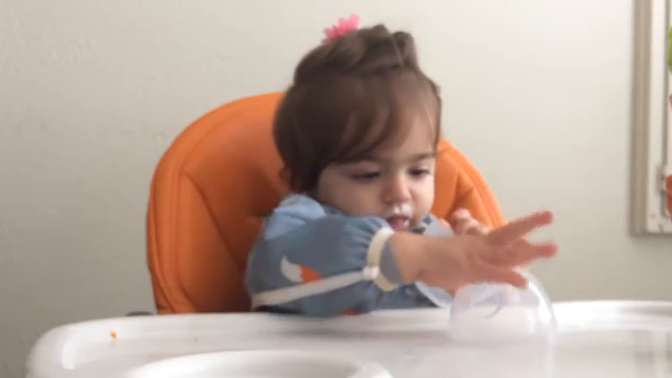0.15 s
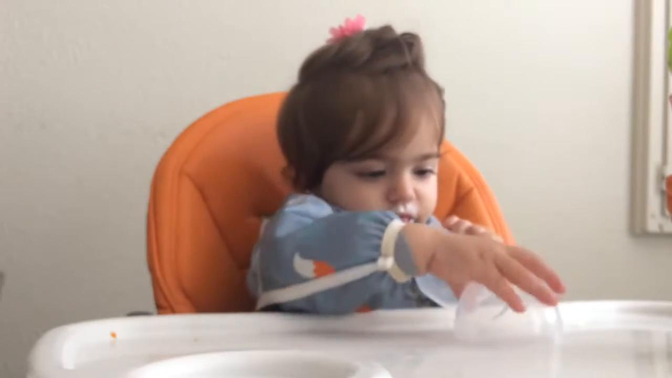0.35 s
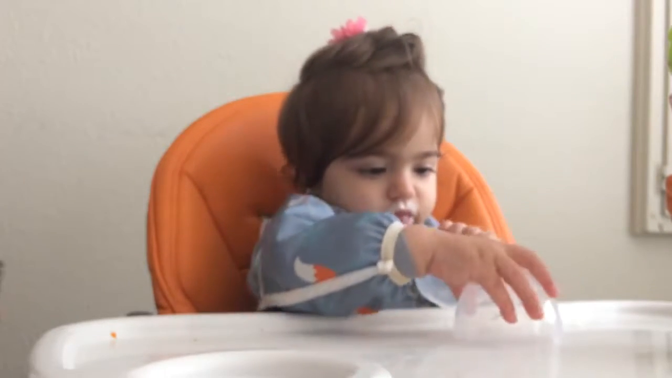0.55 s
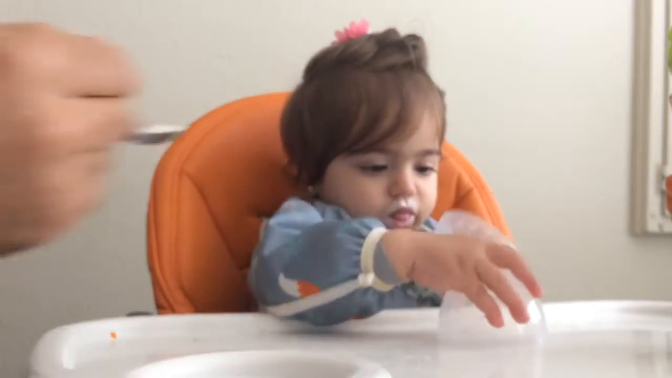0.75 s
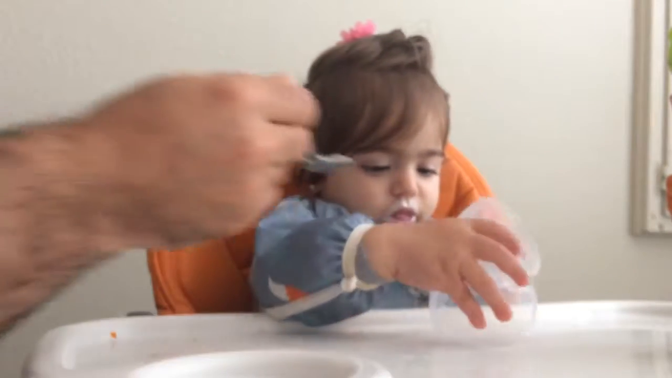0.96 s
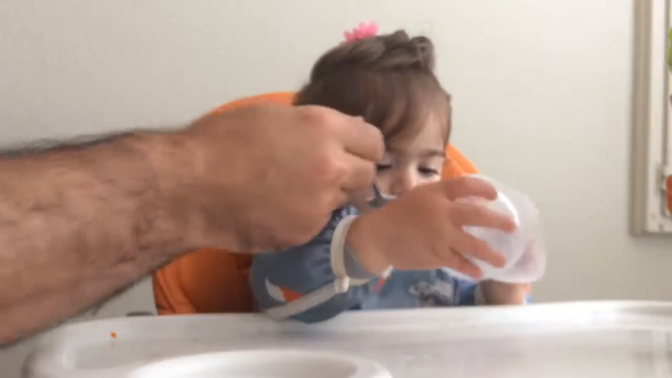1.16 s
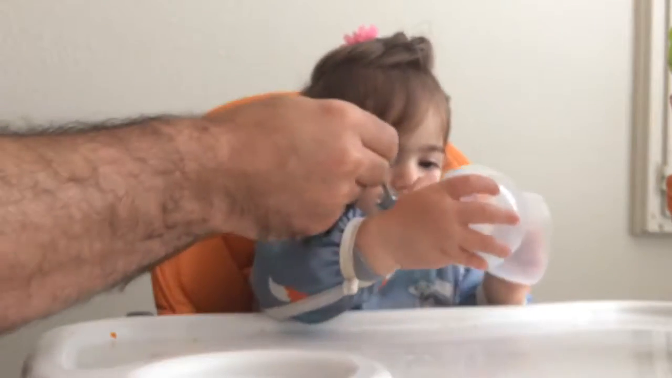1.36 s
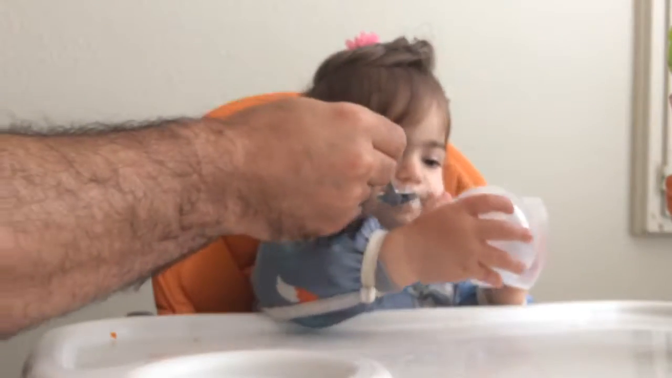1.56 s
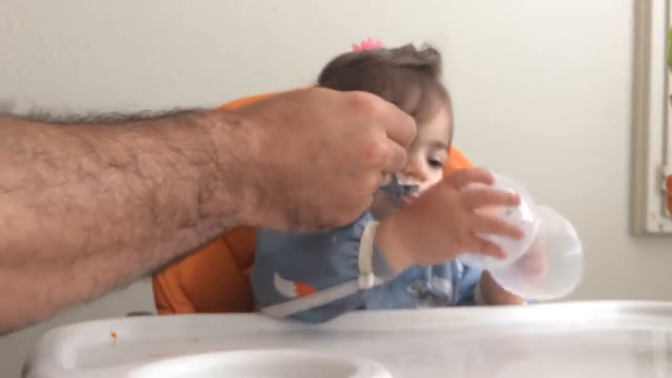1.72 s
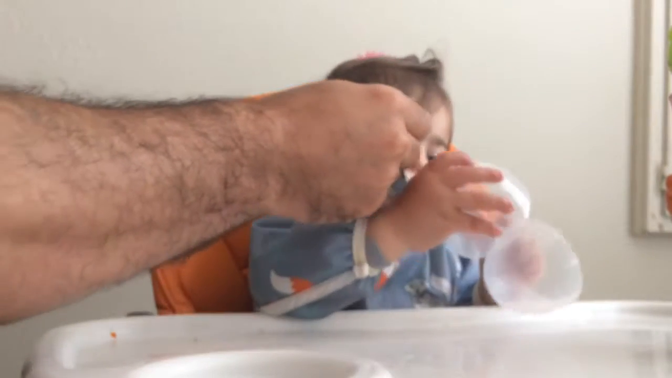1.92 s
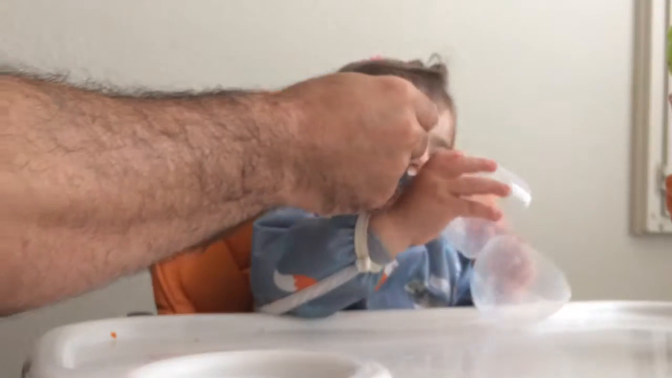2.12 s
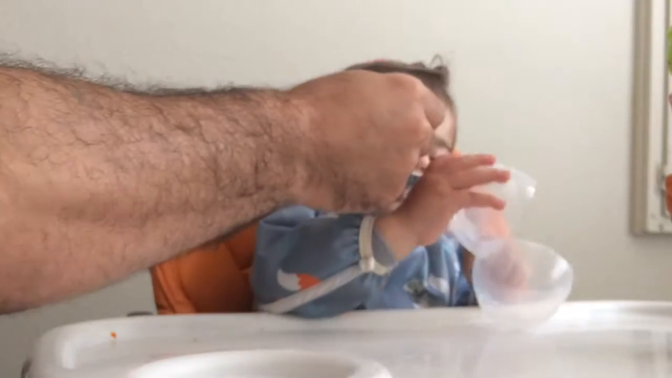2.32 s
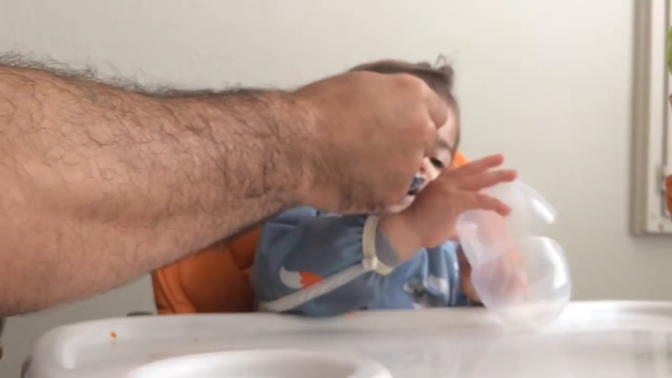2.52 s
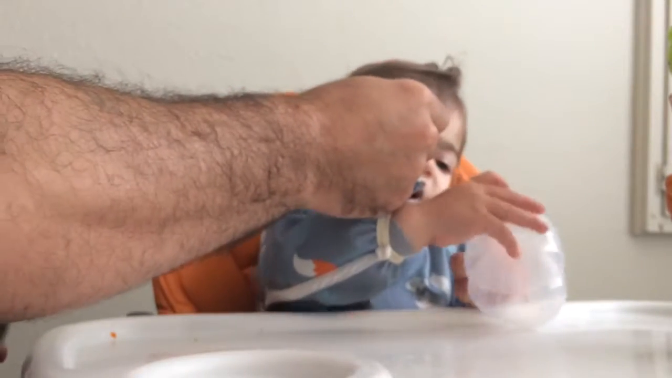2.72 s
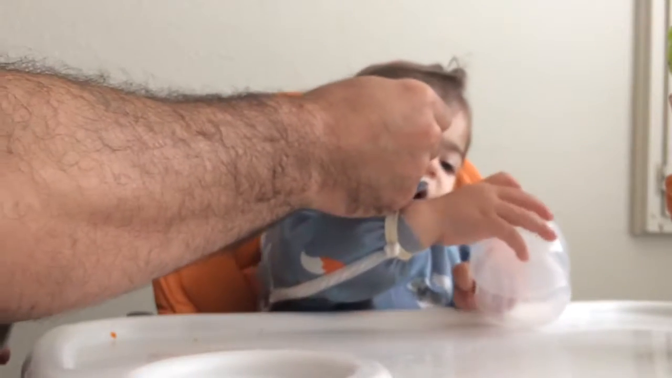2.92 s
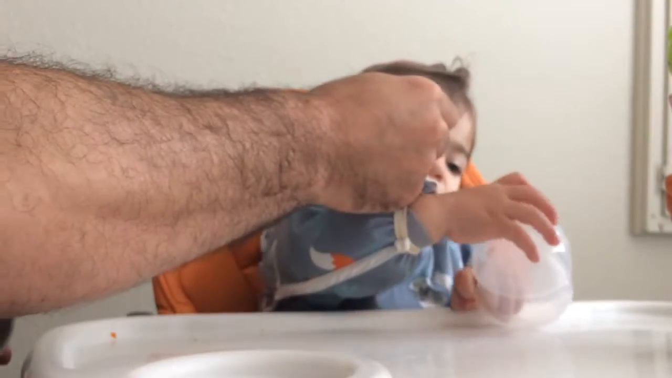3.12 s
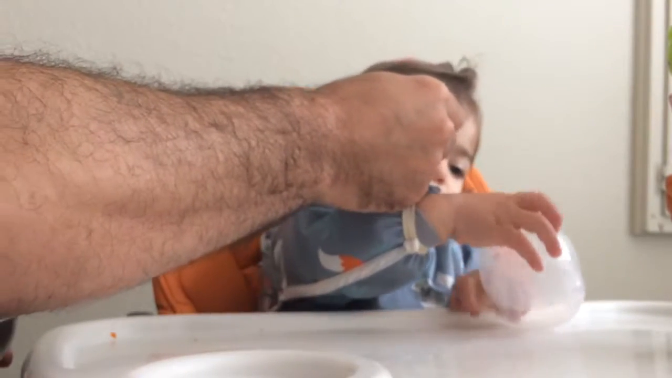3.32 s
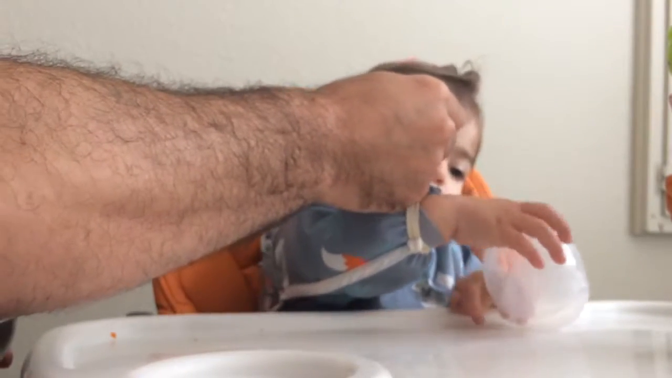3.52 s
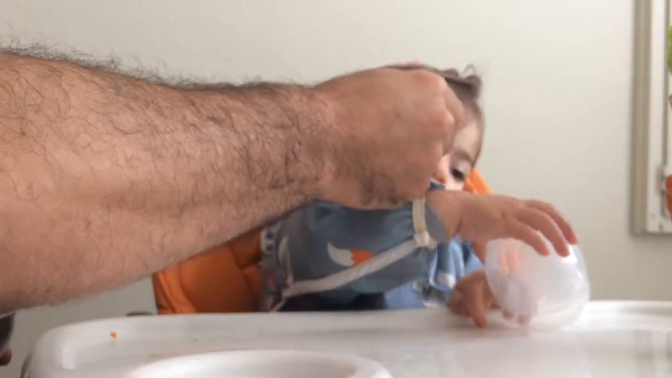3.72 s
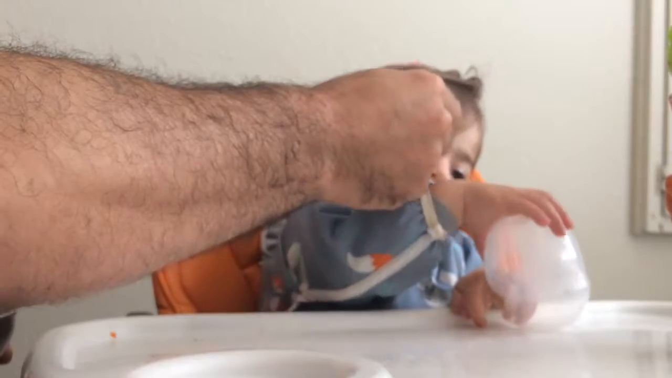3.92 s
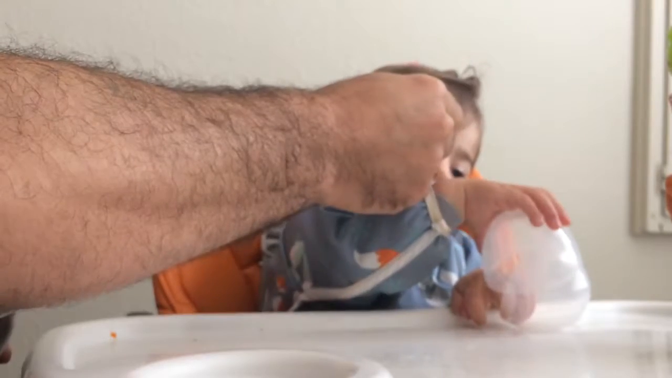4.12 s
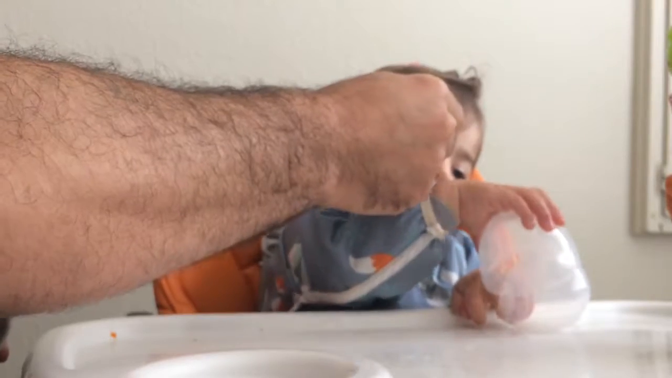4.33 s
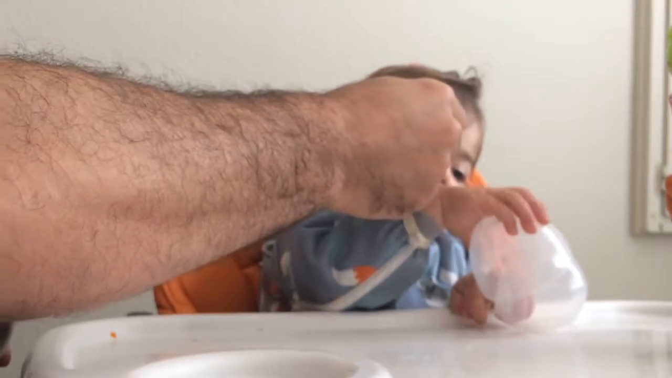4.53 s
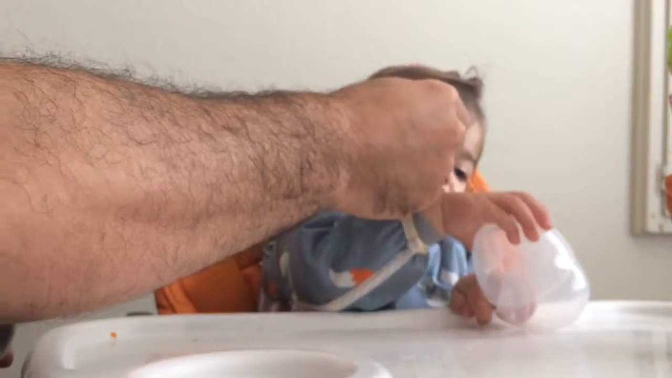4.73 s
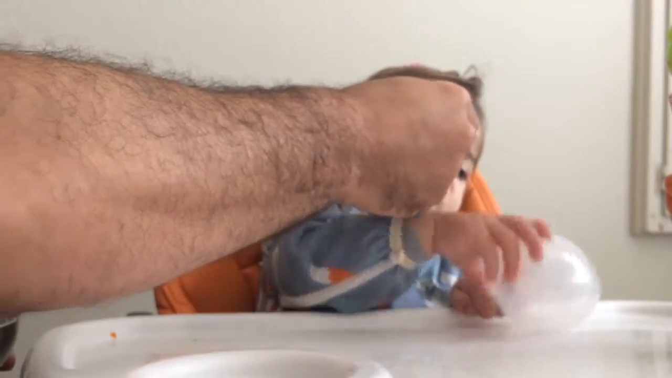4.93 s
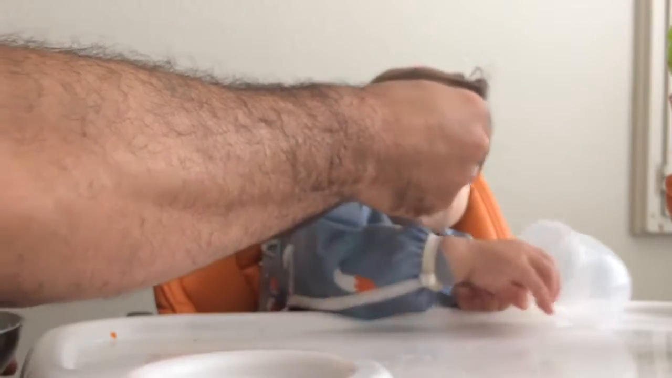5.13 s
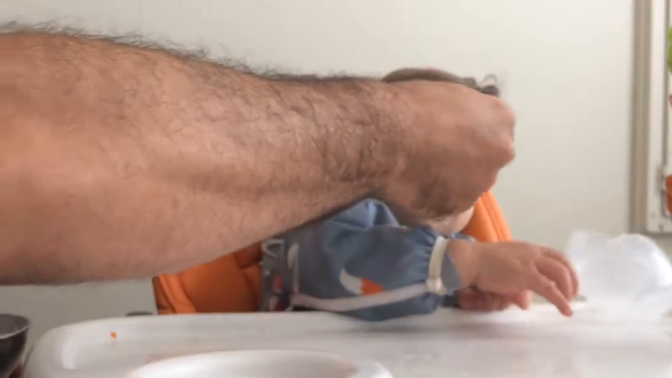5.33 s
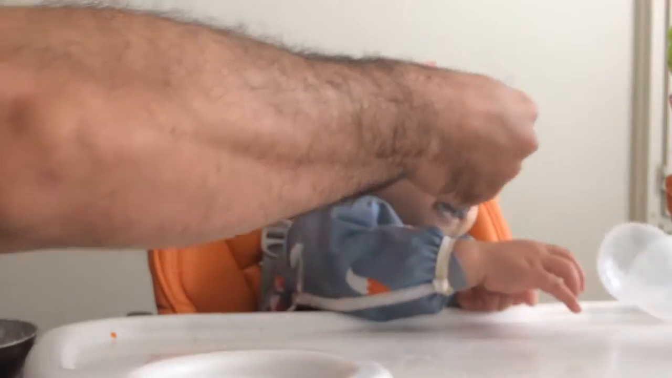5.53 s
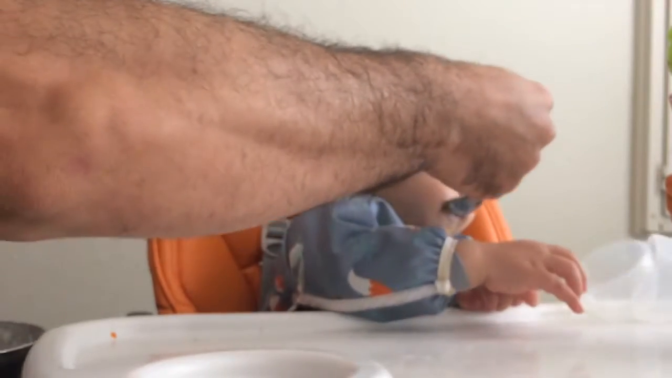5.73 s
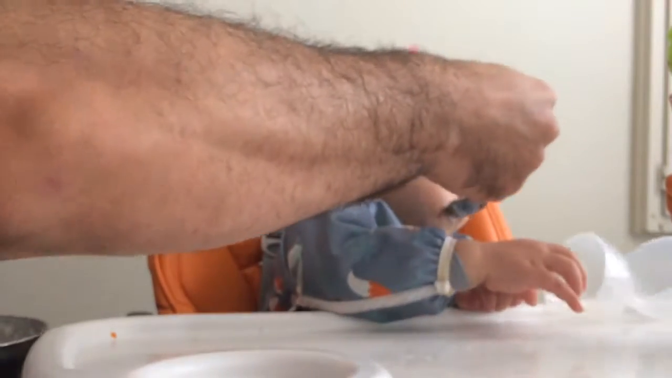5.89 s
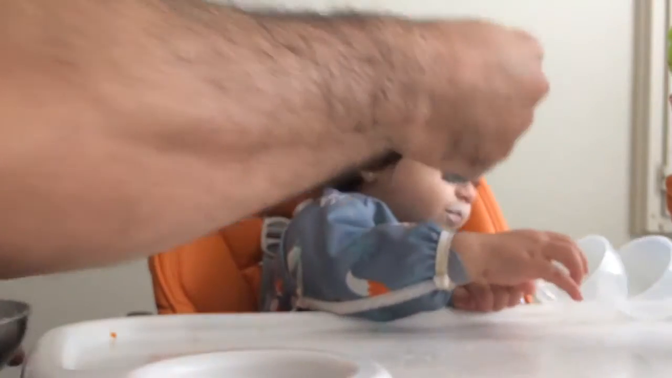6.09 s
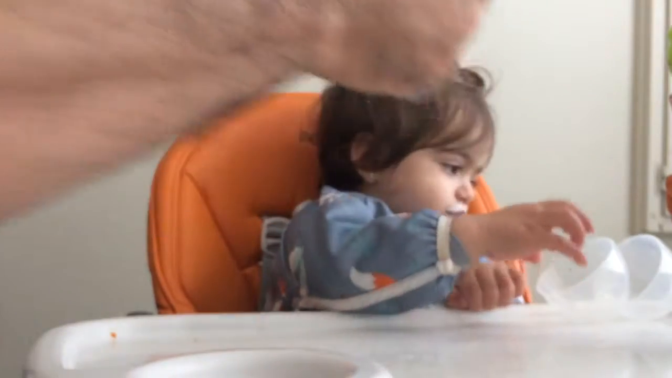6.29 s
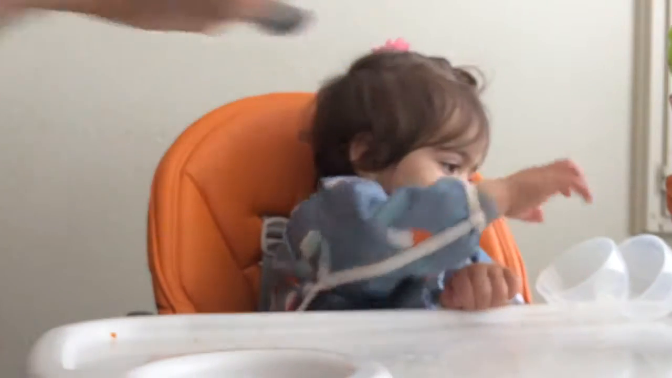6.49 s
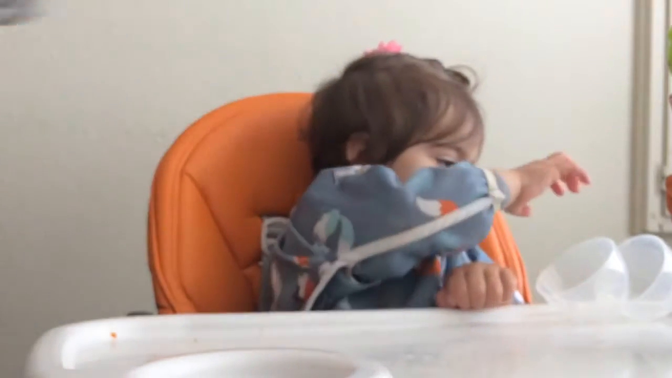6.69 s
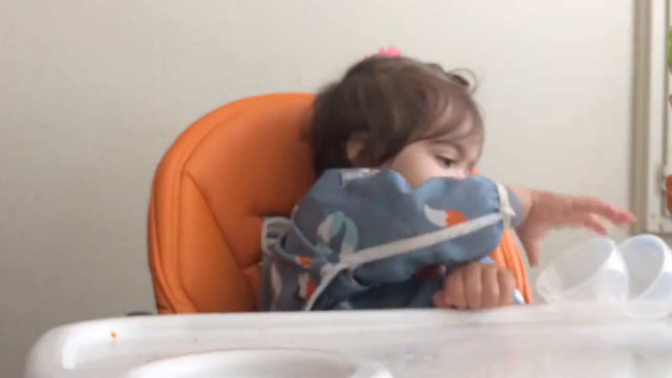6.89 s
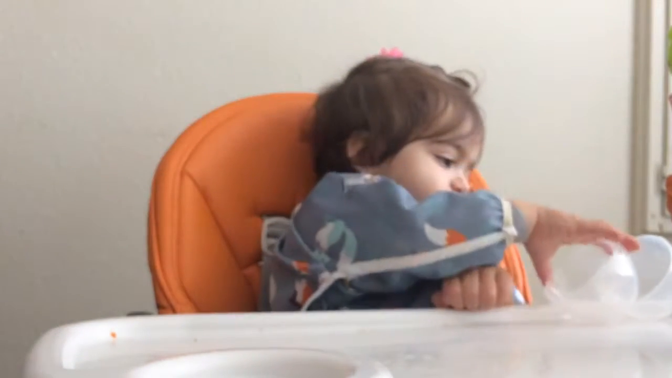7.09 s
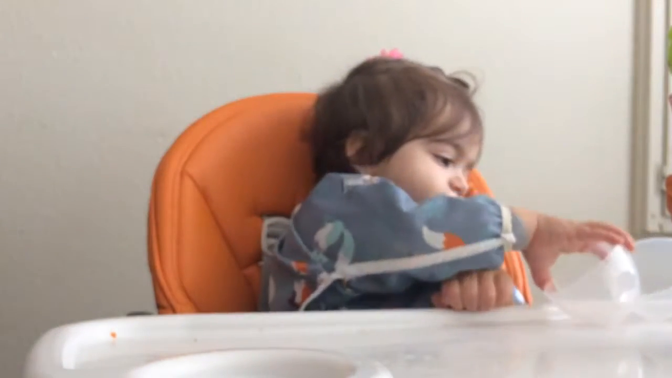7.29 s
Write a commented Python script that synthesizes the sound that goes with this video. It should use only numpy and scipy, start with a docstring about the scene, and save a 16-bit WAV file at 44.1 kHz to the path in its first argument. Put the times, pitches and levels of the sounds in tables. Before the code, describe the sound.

A faint steady hiss and a low appliance hum fill a small room throughout. Two very soft plastic taps come at about 0.4 and 1.1 seconds, among faint brushes of a sleeve. Light plastic bowls then knock clearly against each other and a high chair's plastic tray at 1.7 and 2.2 seconds, with a louder knock and a small rebound around 2.7. Each is close and short, a thin click with a hollow thud and brief ring. A lull follows, with one soft tap and brush at 4.1. At about 5 seconds a bowl tips over in a loud, quick clatter, then rolls on its rim with uneven, lighter knocks. It bumps into the other bowl just before 6 seconds, the loudest hit, and settles with a brief rattle by 6.3. Only the hiss and hum remain until the end, at about 7.5 seconds.

```python
"""A few single knocks of light plastic bowls sound on a high chair's plastic tray in a small room.
Then one bowl tips over, clatters, rolls on its rim and bumps into the other.
Each knock thuds the tray, rings the bowl and clicks its thin wall. Sleeves brush softly,
and an appliance hums behind a steady hiss. Both channels carry the same sound."""
import sys
import numpy as np
from scipy import signal
from scipy.fft import rfft, irfft
from scipy.io import wavfile

SR = 44100
rng = np.random.default_rng(int(sys.argv[2]) if len(sys.argv) > 2 else 0)


def store_pcm(level_fs):
    """Save levels as 16-bit WAV."""
    pcm = np.round(np.clip(level_fs, -1, 1) * 32767).astype(np.int16)
    wavfile.write(sys.argv[1], SR, np.atleast_2d(pcm).T)


N = 324135
RING_TIME = np.arange(SR // 3) / SR  # time axis of one short sound, in seconds


def amp(db):
    """Turns decibels into a gain."""
    return 10 ** (np.asarray(db) / 20)


def unit_rms(x):
    """Scales a sound to an average power of one."""
    return x / np.sqrt(np.mean(x ** 2) + 1e-20)


def unit_energy(x):
    """Scales a sound to a total energy of one."""
    return x / np.sqrt(np.sum(x ** 2) + 1e-20)


def read(points, hz):
    """Looks up a table's value at any pitch, sliding between rows on an octave scale."""
    row_hz, value = np.transpose(points)
    return np.interp(np.log(hz + 1), np.log(row_hz), value)


def coloured(x, points):
    """Makes each pitch in a sound louder or softer, as a table says."""
    gain = amp(read(points, np.fft.rfftfreq(len(x), 1 / SR)))
    return irfft(rfft(x) * gain, len(x))


def add(mix, start_s, sound):
    """Adds a sound to the mix at its start time."""
    part = mix[max(round(start_s * SR), 0):][:len(sound)]
    part += sound[:len(part)]


def drift(fastest_hz):
    """A slow random wander with an average power of one."""
    t = np.arange(N) / SR
    rates_hz = np.geomspace(fastest_hz / 10, fastest_hz, num=10)
    return unit_rms(sum(np.sin(2 * np.pi * (hz * t + rng.random())) / np.sqrt(hz) for hz in rates_hz))


def resonate(x, hz, width_hz):
    """Makes a sound ring at a moving pitch; a narrower width rings longer."""
    turn = np.exp(2j * np.pi * np.cumsum(hz) / SR)
    decay = np.exp(-np.pi * width_hz / SR)
    return 2 * (turn * signal.lfilter([1 - decay], [1, -decay], x / turn)).real


def mode(hz, fade_s):
    """One natural note of a struck object; it dies away by 60 dB in fade_s."""
    return np.sin(2 * np.pi * hz * RING_TIME) * np.exp(-np.log(1000) * RING_TIME / fade_s)


def strike(notes, tilt_db, scatter_db, detune):
    """Rings an object's notes together; the spot struck and the grip vary their strength and pitch."""
    chance = rng.standard_normal((len(notes), 2))
    middle_hz = np.median([row[0] for row in notes])
    sound = 0
    for k, (hz, db, fade_s) in enumerate(notes):
        level_luck, pitch_luck = chance[k]
        gain = amp(db + tilt_db * np.log2(hz / middle_hz) + scatter_db * level_luck)
        sound += (-1) ** k * gain * mode(hz * (1 + detune * pitch_luck), fade_s)  # neighbours oppose
    return unit_energy(sound)


def room(x, gap_s=0.00096, build_s=0.0012):
    """The sound arrives directly, bounces off tray and wall, and leaves a short, fading tail."""
    # how long the tail takes to fall 60 dB: pitch_hz, fade_s
    tail_fades = [(150, 0.47), (500, 0.31), (1200, 0.3), (4000, 0.41), (8000, 0.28), (15000, 0.29)]
    # how strong the tail is: pitch_hz, level_db
    tail_levels = [(150, 3.5), (500, -11), (1200, -10.5), (2300, -6), (3000, -5.5), (3900, -10.5),
                   (5000, -10.5), (8000, -9.5), (15000, -16)]
    # echoes off nearby surfaces: delay_s, gain
    echoes = [(.0021, 0.063), (.0074, 0.15), (.0093, -0.094), (0.0131, .11), (0.017, 0.044)]
    t = np.arange(SR // 2) / SR
    hz, frame_s, bands = signal.stft(rng.standard_normal(len(t)), SR, nperseg=256)
    fade_rate = np.log(1000) / read(tail_fades, hz)[:, None]
    bands = bands * np.exp(-fade_rate * frame_s) * np.sqrt(2 * fade_rate / SR)
    bands *= amp(read(tail_levels, hz))[:, None]
    build_up = np.clip((t - gap_s) / build_s, 0, 1)
    response = signal.istft(bands, SR, nperseg=256)[1][:len(t)] * build_up
    response[0] += 1  # the direct sound
    for delay_s, gain in echoes:
        add(response, delay_s, gain * np.array([.5, .5]))  # uneven surfaces dull the treble
    return signal.fftconvolve(x, response)[:N]


def hiss(level_db=-53, ripple_db=2, ripple_hz=22):
    """Steady air noise; the room's standing waves make some pitches a little louder than others."""
    # the tone of the air noise: pitch_hz, relative_db
    air_colour = [(15, -3), (33, -2.5), (75, -0.5), (200, 1.5), (300, -5), (450, -7), (640, -15),
                  (1100, -16.5), (1700, -12), (2800, -24.5), (4000, -21.5), (5300, -23), (6000, -18.5),
                  (8000, -15.5), (11000, -19), (15500, -30.5)]
    # resonances that stand out of it: pitch_hz, width_hz, boost_db
    humps = [(1480, 73, 4.9), (1562, 13, 10.4), (1771, 153, 10.4), (4844, 96, 8.9), (6894, 83, 11),
             (7130, 146, 7.8), (8290, 180, 4)]
    hz = np.fft.rfftfreq(N, 1 / SR)
    humps_db = sum(db / (1 + (2 * (hz - centre) / width) ** 2) for centre, width, db in humps)
    heights = rng.standard_normal(size=4096)
    ripple = np.interp(hz / ripple_hz, np.arange(len(heights)), heights) * np.minimum(hz / 1000, 1)
    colour_db = read(air_colour, hz) + humps_db + ripple_db * ripple
    return amp(level_db) * unit_rms(irfft(rfft(rng.standard_normal(N)) * amp(colour_db), N))


def hum(waver_db=1.5, waver_hz=0.42):
    """A distant appliance motor whose speed and level waver slightly."""
    # the motor's tones: pitch_hz, level_db
    tones = [(103.3, -53), (243, -73.5)]
    speed = 1 + waver_hz / tones[0][0] * drift(4)
    motor_time = np.cumsum(speed) / SR
    return sum(amp(db + waver_db * drift(5.1)) * np.sqrt(2) * np.sin(2 * np.pi * hz * motor_time)
               for hz, db in tones)


def brushes(grain=0.16, rub_db=11, rub_octaves=0.76):
    """Cloth and skin slide over plastic in short, grainy swells, each with its own rubbing pitch."""
    # soft strokes of hand and sleeve: start_s, length_s, level_db, rub_hz
    strokes = [(0.747, 0.1, -60, 2000), (0.92, 0.23, -67, 4800), (1.11, 0.066, -56, 1900),
               (1.472, 0.15, -66.5, 4000), (2.311, 0.12, -57.5, 2680), (4.091, 0.094, -64, 1500)]
    # the tone all strokes share: pitch_hz, relative_db
    cloth_colour = [(200, -33), (1100, 4), (2000, 3), (3000, 0.5), (4700, 3), (6500, -2), (15000, -42)]
    out = np.zeros(N)
    hz = np.fft.rfftfreq(len(RING_TIME), 1 / SR)
    for start_s, length_s, level_db, rub_hz in strokes:
        slips = rng.standard_normal((2, len(RING_TIME)))[0]
        grainy = slips * np.exp(grain * slips)
        octaves_away = np.log2((hz + 1) / rub_hz)
        colour_db = read(cloth_colour, hz) + rub_db / (1 + (octaves_away / rub_octaves) ** 2)
        fibres = unit_rms(irfft(rfft(grainy) * amp(colour_db)))[:round(length_s * SR)]
        add(out, start_s, amp(level_db) * np.hanning(len(fibres)) * fibres)
    return out


def rolling(bumps_per_s=520, spread_db=3, ring_db=-4, ring_width_hz=130, fade_s=0.072):
    """The rim meets the tray in tiny, uneven bumps that ring the bowl at a pitch that moves as it turns."""
    # the bowl rolling and settling on its rim: time_s, level_db, ring_hz
    path = [(4.9, -59.5, 1000), (4.984, -57.5, 1000), (5.13, -60, 1040), (5.31, -58, 750), (5.39, -61, 746),
            (5.464, -57, 1110), (5.53, -53, 1140), (5.62, -60, 1110), (5.70, -60.5, 580), (5.82, -65, 910),
            (5.86, -48.5, 850), (5.945, -57, 730), (5.99, -50, 1190), (6.05, -51.5, 1440),
            (6.12, -62, 1480), (6.3, -83, 1500)]
    # the tone of the rim on the tray: pitch_hz, relative_db
    scrape_colour = [(80, -22), (220, -8), (400, 10.5), (650, 4.5), (1150, 5.5), (2200, -3), (3700, -8),
                     (7000, -6.5), (15000, -31)]
    t = np.arange(N) / SR
    time_s, level_db, ring_hz = np.transpose(path)
    sizes = amp(spread_db * np.minimum(rng.exponential(1, N), 3)) * rng.choice([-1, 1], N)
    bumps = sizes * (rng.random(N) < bumps_per_s / SR)
    scrape = coloured(bumps, scrape_colour)
    ring = resonate(scrape, np.interp(t, time_s, ring_hz), ring_width_hz)
    roll = unit_rms(unit_rms(scrape) + amp(ring_db) * unit_rms(ring))
    moving = np.clip(np.minimum(t - time_s[0], time_s[-1] - t) / fade_s, 0, 1)
    return roll * moving * amp(np.interp(t, time_s, level_db))


def hollow(hz, swell_s=0.01065, note_db=4, sag_s=0.063):
    """The hollow under the tray booms a little late; its note sinks as the load lifts."""
    # the tone of the tray's hollow underside: pitch_hz, relative_db
    air_colour = [(90, -36), (190, -37), (300, -2), (400, -16), (600, -28), (1000, -2.5), (3000, -36)]
    swell = (RING_TIME * np.exp(-RING_TIME / swell_s)) ** 2
    air = unit_energy(coloured(rng.standard_normal(len(RING_TIME)), air_colour) * swell)
    turns = np.cumsum(hz * np.exp((swell_s - RING_TIME) / sag_s)) / SR
    note = unit_energy(np.sin(2 * np.pi * turns) * swell)
    return unit_energy(air + amp(note_db) * note)


def wall_click(tilt_db, spot_hz, snap_db=-4.0, snap_s=0.0013, spot_db=-3.5, spot_fade_s=0.013):
    """The thin wall's high notes, the note of the spot struck, and a snap of noise as the edges meet."""
    # the tone of the snap: pitch_hz, relative_db
    snap_colour = [(500, -35), (2500, 2), (6000, 6.5), (10000, -3), (16000, -16)]
    # natural notes of a bowl's thin wall: pitch_hz, relative_db, fade_s
    wall_notes = [(2480, -3, 0.0087), (3200, -7, 0.005), (3850, 1.5, 0.0082), (4130, 0.5, 0.0034),
                  (4920, -3.5, 0.0021), (5900, -1.5, 0.0067), (6370, 2, 0.0034), (7000, -1.5, 0.0042),
                  (9000, -8, 0.0035), (11200, -11, .003), (14100, -11, 0.0024)]
    noise = coloured(rng.standard_normal(len(RING_TIME)), snap_colour)
    snap = unit_energy(noise * np.exp(-RING_TIME / snap_s))
    wall = strike(wall_notes, tilt_db, scatter_db=5.0, detune=0.03)
    spot = unit_energy(mode(spot_hz, spot_fade_s))  # stands out more when the contact is soft
    return unit_energy(wall + amp(spot_db - tilt_db / 2) * spot + amp(snap_db + tilt_db / 2) * snap)


def bowl_ring(hz, fade_s, overtones_db, flex_s=0.001):
    """The whole bowl flexes at a pitch set by how it is held; its higher notes die sooner."""
    # the bowl's higher notes: pitch_ratio, relative_db
    overtones = [(1.52, 12.5), (2.1, 6), (3.08, 7.5)]
    upper = sum((-1) ** k * amp(db) * mode(hz * ratio, fade_s / np.sqrt(ratio))
                for k, (ratio, db) in enumerate(overtones))
    flex = 1 - np.exp(-RING_TIME / flex_s)  # plastic gives way before it springs back
    return unit_energy(flex * (mode(hz, fade_s) - amp(overtones_db) * upper))


def contact(level_db, ring_hz, fade_s, tray_db, boom_hz, boom_db, click_db, click_hz, tilt_db):
    """One knock thuds the tray, rings the bowl and clicks its wall."""
    # natural notes of the tray: pitch_hz, relative_db, fade_s
    tray_notes = [(135, -13, 0.065), (210.5, -7.5, 0.074), (265, -7, 0.06), (397, 4, 0.012),
                  (570, 5.5, 0.018), (595, 2.5, 0.031), (687, 3, 0.014)]
    # longer-lasting notes of the bowl's wide rim: pitch_hz, relative_db, fade_s
    rim_notes = [(890, -14, .2), (960, 13, 0.087), (1025, -15, 0.18), (1110, 5, 0.22), (1200, -7, 0.25),
                 (1635, 3, 0.22)]
    tray = strike(tray_notes, tilt_db=0, scatter_db=1.2, detune=.02)
    rim = strike(rim_notes, tilt_db=0, scatter_db=1.5, detune=.002)
    thud = unit_energy(tray + amp(boom_db) * hollow(boom_hz))
    # pressing on the tray brings out the bowl's higher notes
    ring = bowl_ring(ring_hz, fade_s, overtones_db=-19.5 + 2 * tray_db)
    click = wall_click(tilt_db, click_hz) + amp(-16) * rim  # sharp knocks set the free rim singing
    return amp(level_db) * (ring + amp(tray_db) * thud + amp(click_db) * click)


def knocks():
    """The bowls hit the tray and each other: single knocks first, then a quick clatter."""
    # one row a knock: start_s, level_db, ring_hz, fade_s, tray_db, boom_hz, boom_db,
    # click_db, click_hz, tilt_db (per octave; higher makes the click brighter)
    blows = [ (0.378, -41, 1060, .017, -5, 420, -4, 4, 3350, -10),
             (1.088, -34, 890, 0.022, 5, 335, 1, -12, 3800, -2),
             (1.7232, -7, 1470, 0.0045, -18, 524, -6, -6.5, 4050, 1.5),
             (2.1608, -9, 1270, 0.0048, 5, 491, -0.5, -7, 3140, 2),
             (2.637, -27, 1070, .008, -6, 450, 5, -11, 3800, -1),
             (2.7320, -2.5, 1270, 0.0099, -11.5, 440, 0.5, -12.5, 4150, -1.5),
             (2.8325, -20.5, 1004, 0.033, -6, 480, 1, 0.5, 4800, -0.5),
             (4.1232, -32.5, 1010, 0.019, -9, 450, -11, -21, 3800, -4),
             (5.0519, -11.5, 1074, 0.016, 2, 541, -6, 1, 6040, 6.5),
             (5.0644, -16, 1110, .02, -1, 507, -7, -18, 3000, -2),
             (5.081, -4, 1020, 0.012, -4, 585, -3, 3, 4900, 4),
             (5.1110, -13, 1070, 0.013, -4.5, 554, 0, -7, 5600, 11),
             (5.121, -25, 1050, .016, -9, 556, -2, 0, 4700, -1),
             (5.1429, -16.5, 990, 0.02, -3, 547, -4, -0.5, 3850, -12),
             (5.2653, -16.5, 1640, 0.016, -2.5, 423, 0, -6, 5370, -9),
             (5.2796, -14.5, 910, 0.004, -6.5, 417, -2, -19, 3800, -4),
             (5.2873, -19, 1020, .012, -1.5, 426, -6, -19, 3820, 1),
             (5.3260, -27, 790, .016, 2, 404, -4, -20, 3800, -4),
             (5.4103, -8, 784, 0.021, 2.5, 489, -5.5, -9.5, 2190, -4),
             (5.464, -24, 1144, .035, 3.5, 460, 1, -7, 3800, 5),
             (5.507, -33, 1120, .025, -2, 476, -2, 2.5, 3600, -4),
             (5.5727, -25.5, 1100, .012, -5, 523, -6, 3, 2900, 7),
             (5.5908, -16, 1103, 0.03, 1.5, 615, -1, -4, 2550, -4),
             (5.6007, -21.5, 1130, .024, -6, 555, -2, -7, 3600, 6),
             (5.6493, -26.5, 905, .024, 5.5, 557, 0, 1.5, 3880, 18),
             (5.664, -28.5, 990, .02, 5, 540, -2, 2, 3040, -2),
             (5.7820, -24, 1070, .031, -1, 546, -4, 5, 4960, 5),
             (5.798, -26, 1130, .031, 0, 566, 1, 0.5, 6000, 7),
             (5.863, -17, 850, 0.018, 2.5, 577, -5, -3.5, 3030, 7),
             (5.898, -30, 755, .025, -3, 570, 0, 2.5, 6540, 11),
             (5.923, -31, 740, .025, 2, 560, -2, -4, 6400, 3),
             (5.9697, -1, 1472, 0.018, -6.5, 429, -5, -12, 3730, 2),
             (5.9790, -16.5, 1270, .017, -2, 330, -15, -25, 4000, -5),
             (5.9949, -19.5, 1190, .012, 3, 604, -1, -8, 3500, 2),
             (6.013, -19, 1460, 0.018, -11, 600, -4, -26, 3500, -5),
             (6.021, -25, 1480, 0.012, -10, 450, -2, -29, 3500, -10),
             (6.029, -23, 1560, .015, -4, 450, -2, -22, 3500, -5),
             (6.0444, -14.5, 1320, 0.0062, -4, 433, 5, -24, 5900, -3),
             (6.059, -28, 1410, .018, -2, 418, 0, -22, 3500, -5)]
    out = np.zeros(N)
    for start_s, *blow in blows:
        add(out, start_s, contact(*blow))
    return out


def scene():
    """Bowls and sleeves in the room, over hiss and hum; the same on both channels."""
    mono = room(knocks() + rolling() + brushes()) + hiss() + hum()
    return np.array([mono, mono])


def record(dry, cutoff_hz=16400):
    """Cuts away the very highest treble."""
    low_pass = signal.firwin(255, cutoff_hz, window=("kaiser", 9), fs=SR)
    return signal.oaconvolve(dry, low_pass[None], "same")


dry = scene()
out = record(dry)
store_pcm(out)
```